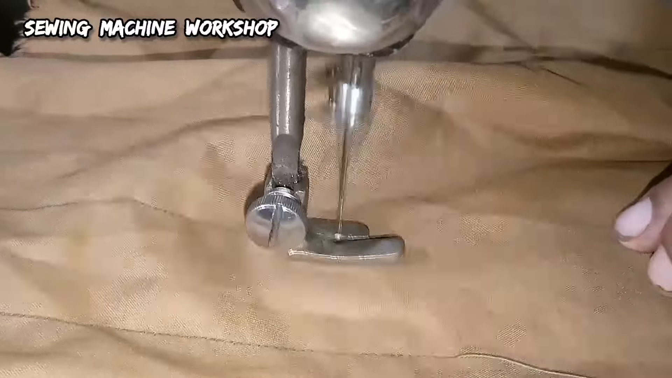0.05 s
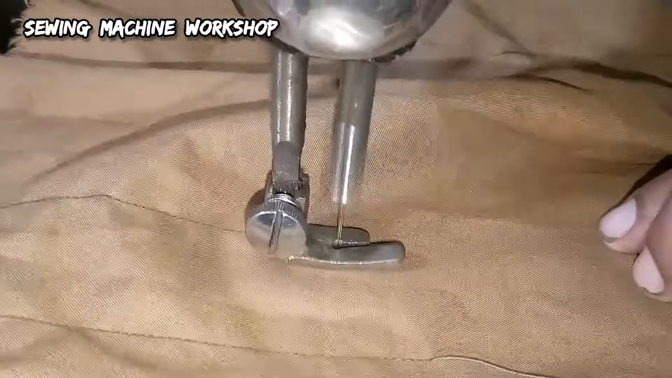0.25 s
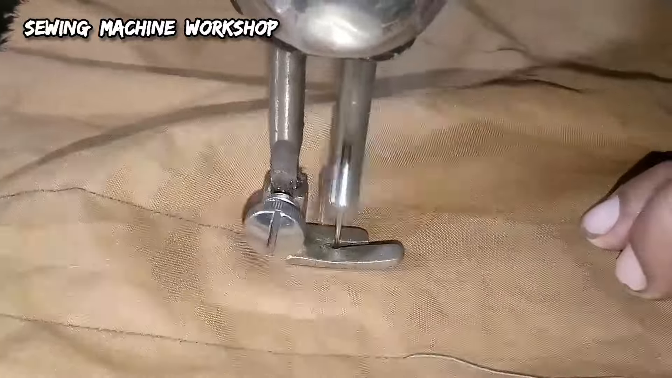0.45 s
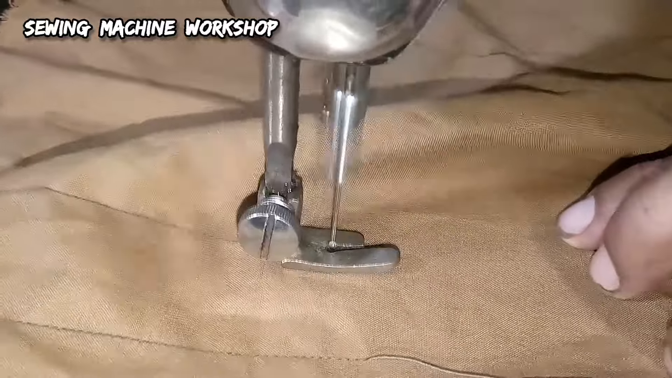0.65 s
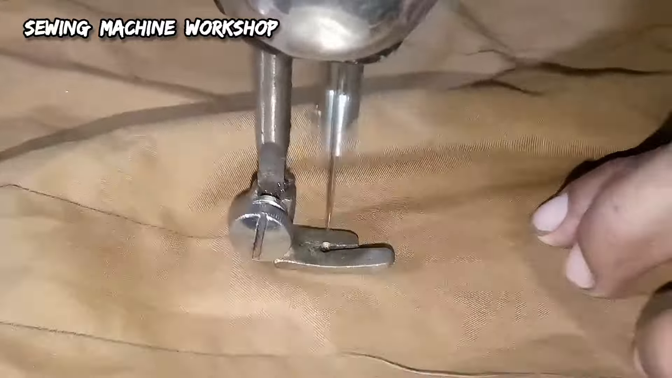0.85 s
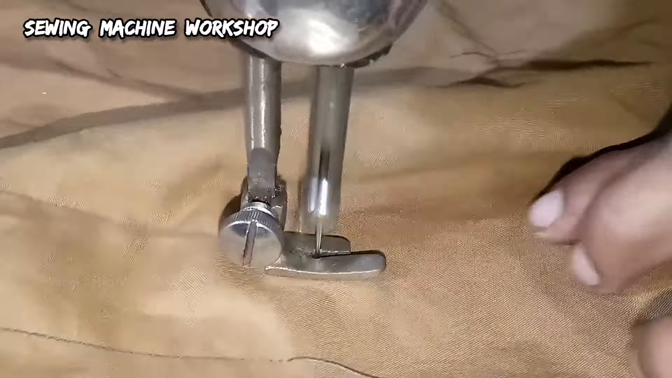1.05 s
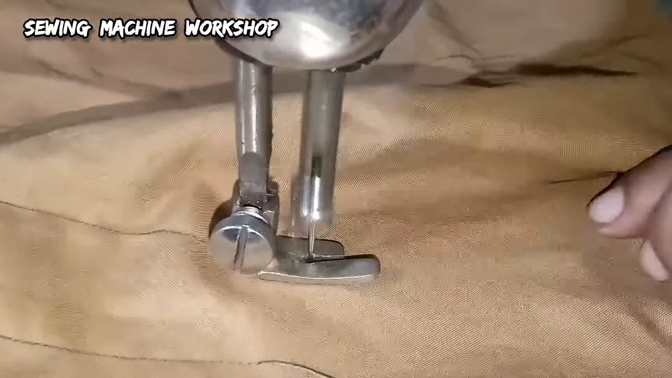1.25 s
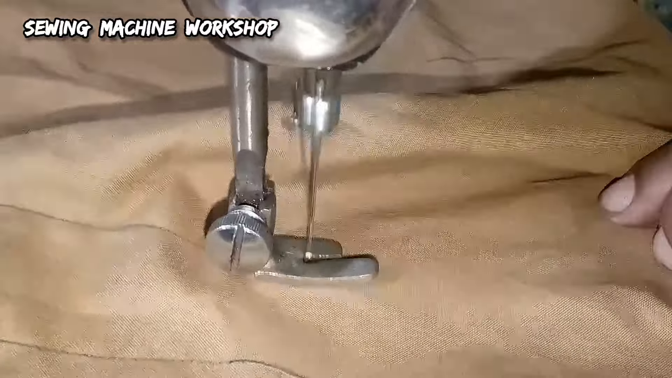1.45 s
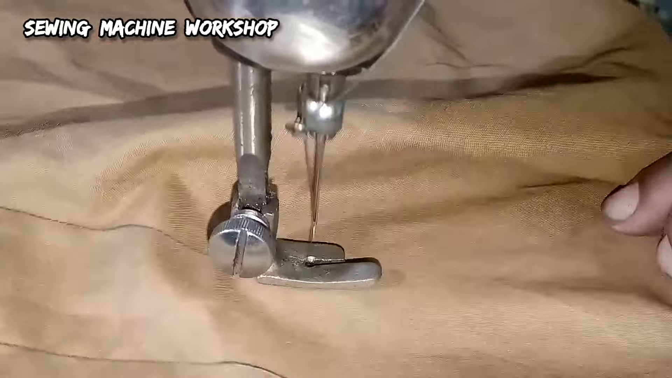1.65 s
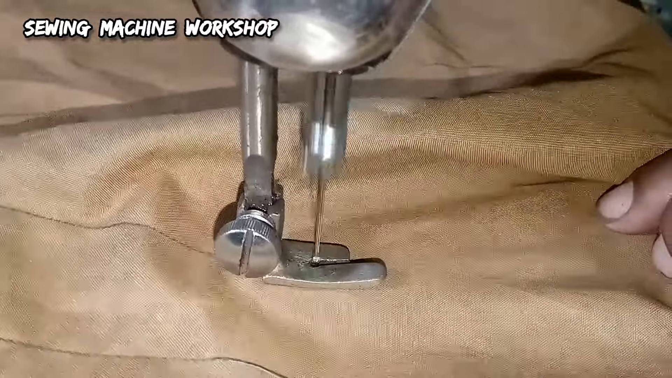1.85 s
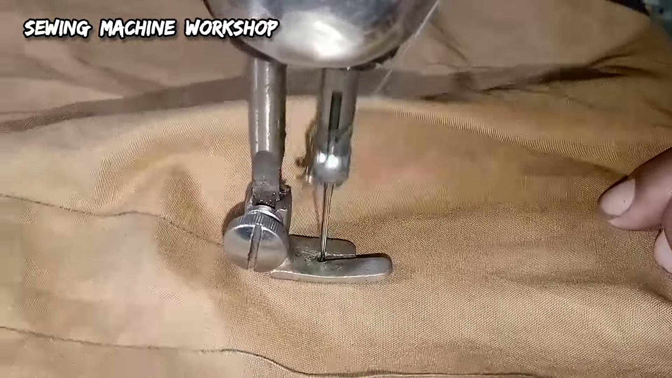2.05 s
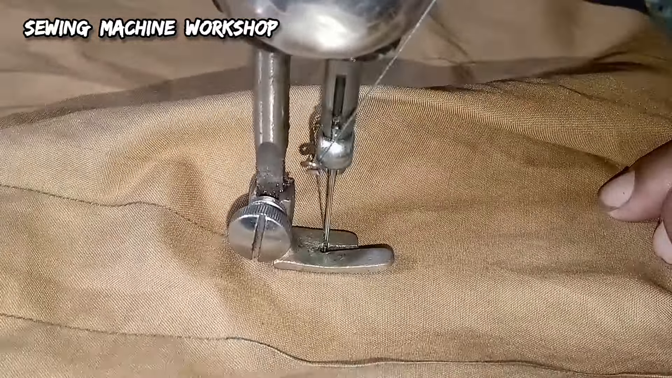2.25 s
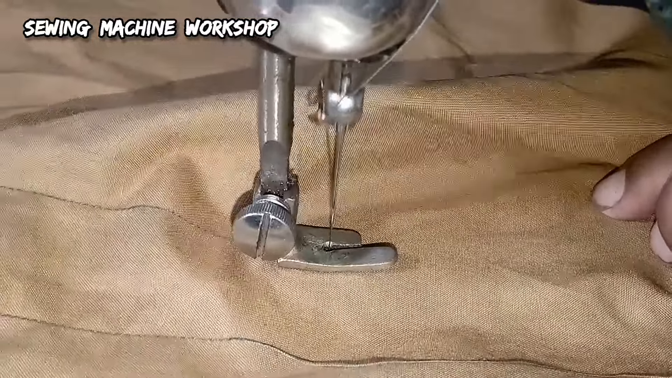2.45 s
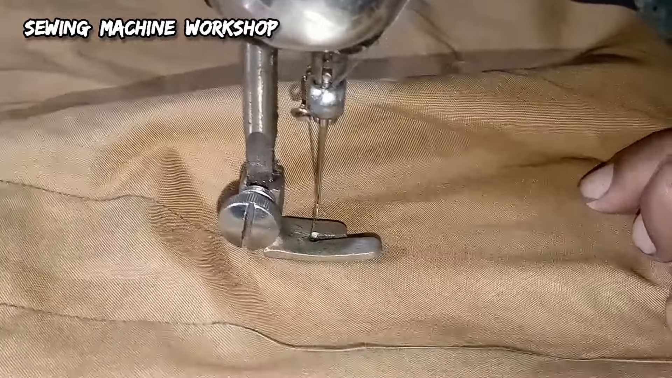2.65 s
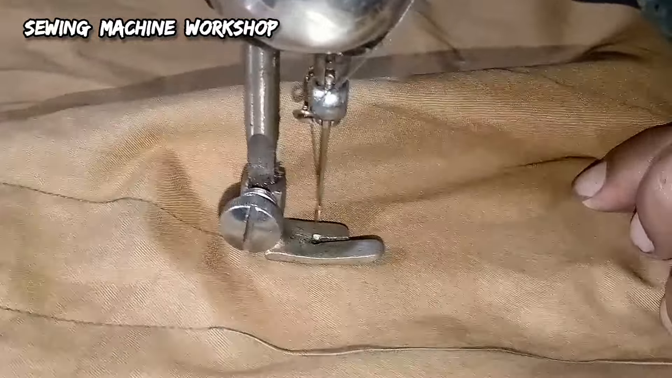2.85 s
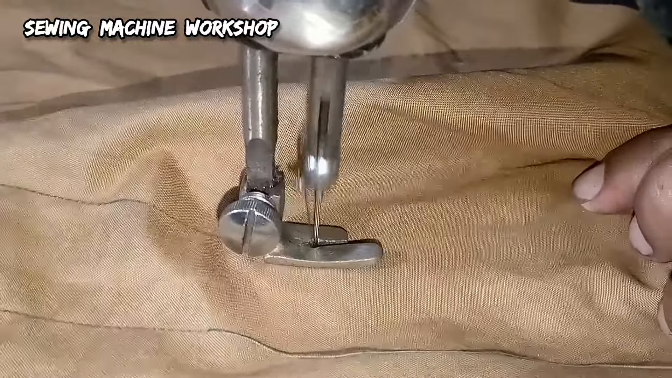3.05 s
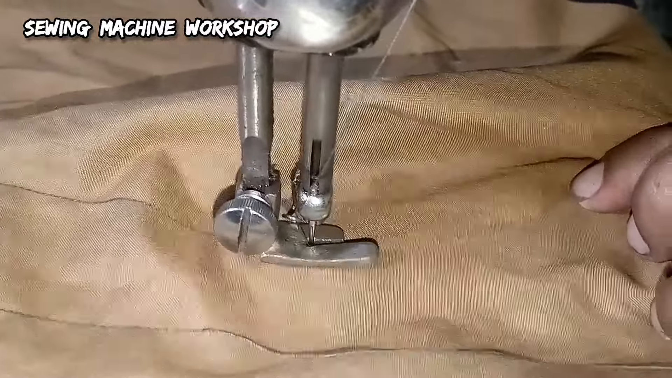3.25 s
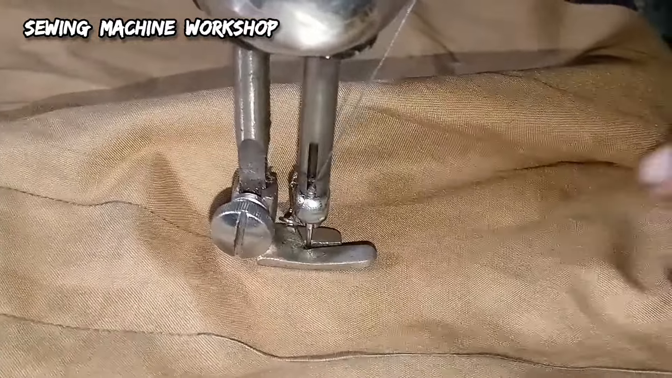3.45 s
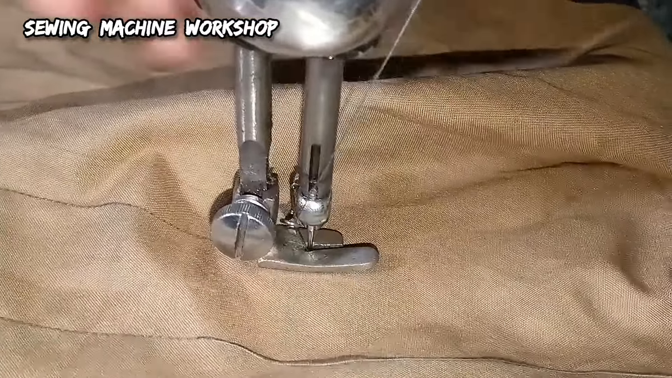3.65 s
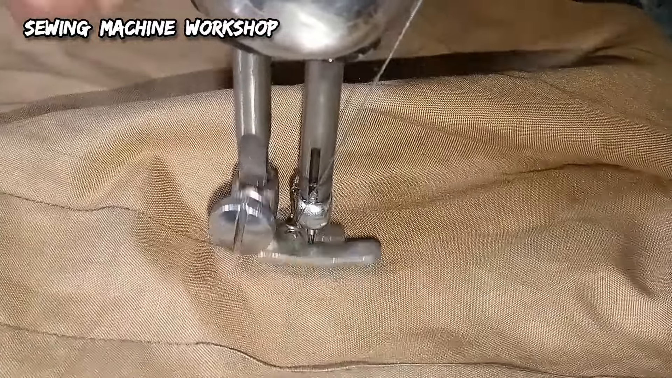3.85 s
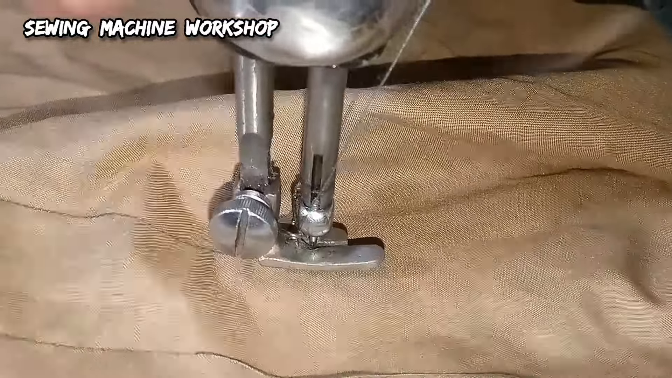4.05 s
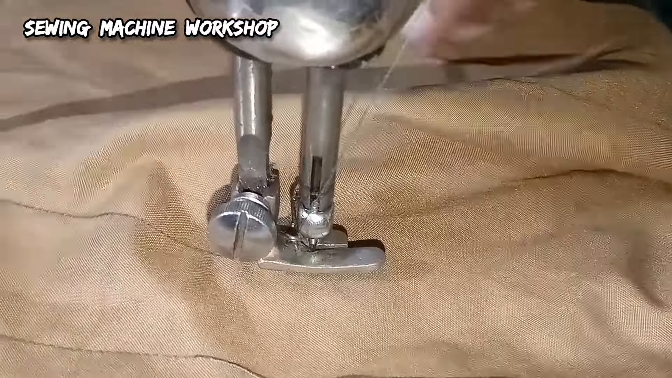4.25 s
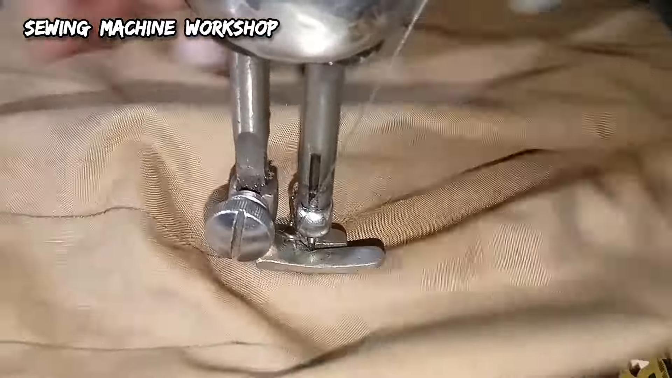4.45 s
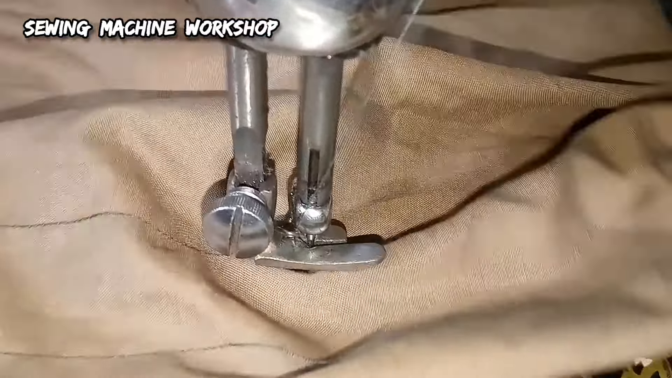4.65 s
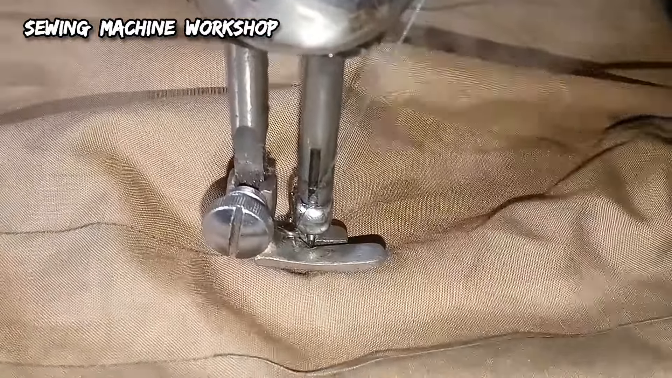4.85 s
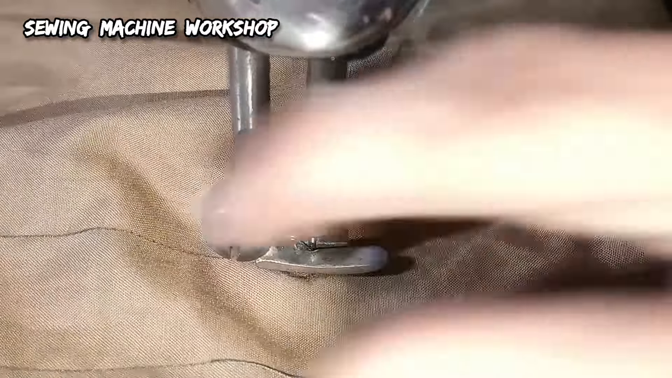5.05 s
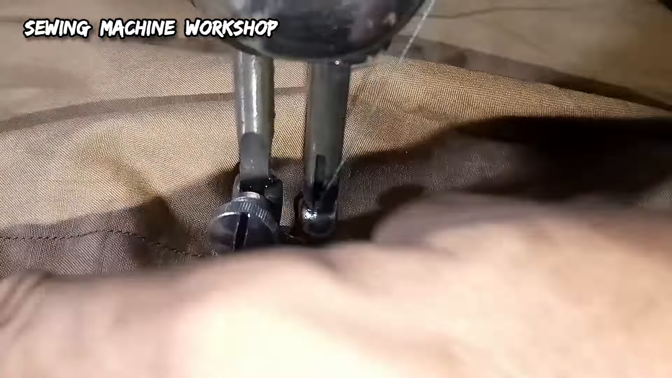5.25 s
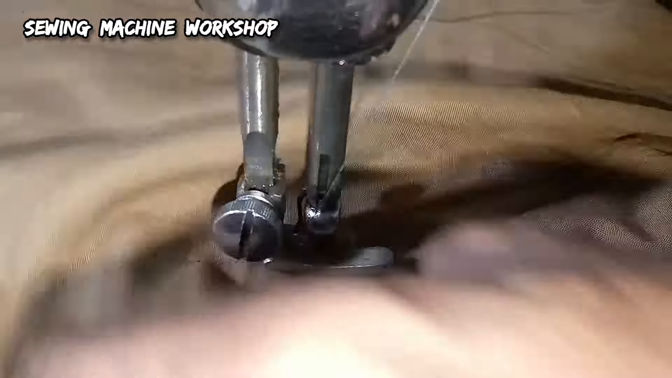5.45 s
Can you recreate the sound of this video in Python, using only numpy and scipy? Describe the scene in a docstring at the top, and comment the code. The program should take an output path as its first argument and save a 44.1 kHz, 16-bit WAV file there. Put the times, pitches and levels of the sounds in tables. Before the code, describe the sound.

One continuous fast run of stitching, nearly twenty strokes per second and slightly uneven, with a hard clack about one second in, winds down to a halt. The much quieter remainder holds small mechanical clicks, a short scrape, a couple of firmer clacks, then fabric sliding and light hand taps on the table and metal plate. Dry close microphone, short indoor reflections, low room rumble, barely audible cricket chirps.

```python
"""A sewing machine runs a seam at up to 19 stitches/s, close to the microphone, and coasts to a stop at 2.25 s.
The needle is then inched by hand, the mechanism clacks and the cloth is shifted; room noise, a faint cricket.
Every shaft turn plays one round of knocks through resonant bed, arm, linkage and needle, and shoves the table.
Each part loses a fixed number of dB per halving of speed; at a crawl the knocks fade further.
Scraping and cloth are grainy noise through the same kind of resonances; the cricket is a noise-smeared tone."""
import sys
import numpy as np
from scipy import signal
from scipy.fft import rfft, irfft
from scipy.io import wavfile
from scipy.ndimage import uniform_filter1d

SR = 44100
rng = np.random.default_rng(int(sys.argv[2]) if len(sys.argv) > 2 else 0)


def wav_record(signal):
    """Record a signal, one row per channel, as 16-bit PCM in the file named by sys.argv[1]."""
    frames = np.transpose(np.atleast_2d(signal))
    bounded = np.clip(frames, -1, 1)
    # unit amplitude maps onto the largest positive 16-bit level
    quanta = np.round(bounded * 32767).astype(np.int16)
    wavfile.write(sys.argv[1], SR, quanta)


N = 242546
TIME = np.arange(N) / SR

# resonances of the machine bed: f/Hz, width/Hz, level/dB
BED_MODES = [(364, 15, 0), (413.2, 18, 7), (440, 13, 5.5), (478, 35, -17), (611, 130, -11)]
# resonances of the arm: f/Hz, width/Hz, level/dB
ARM_MODES = [(757, 23, -22.5), (781, 49, -10.5), (1053.8, 31, 3)]
# resonances of the linkage: f/Hz, width/Hz, level/dB
LINKAGE_MODES = [(1124, 340, -11), (1632, 270, -5.5), (1836, 160, 2.3), (2020, 240, -5), (2310, 230, -3.5),
                 (2478, 230, 2), (2730, 150, -5), (3074, 610, -17), (4020, 2500, -25.5)]
# resonances of the needle: f/Hz, width/Hz, level/dB
NEEDLE_MODES = [(4400, 430, -28), (5000, 540, -3.5), (5754, 520, 2.5), (6190, 450, 7), (7060, 1000, -12.5),
                (9205, 2400, -26), (12000, 4000, -35.5), (14800, 1000, -33)]
# broad colour of cloth sliding on the bed: f/Hz, width/Hz, level/dB
CLOTH_MODES = [(410, 310, 4), (1047, 600, -5), (1730, 900, -0.5), (2378, 600, -0.5), (3640, 2600, -20.5),
               (6100, 1700, -13), (9800, 6000, -39)]


def undb(db):
    """Decibels to amplitude gain."""
    return 10 ** (np.asarray(db) / 20)


def unit(x):
    """Scale to rms 1."""
    return x / np.sqrt(np.mean(x ** 2))


def through(x, response):
    """Convolve with an impulse response, cut to scene length."""
    return signal.fftconvolve(x, response)[:N]


def body(modes, contact=1.47):
    """Minimum-phase impulse response, unit energy; wide modes stand for clusters and get steeper skirts."""
    f_hz = np.arange(1, SR // 4 + 2) * 2.
    power = 0
    for mode_hz, width_hz, db in modes:
        detune = (f_hz / mode_hz - mode_hz / f_hz) * mode_hz / width_hz
        skirt = detune ** 4 if width_hz > 140 else detune ** 2
        power = power + undb(db) ** 2 / (1 + skirt)
    # heavy parts give way slowly: roll-off above the highest mode
    top_hz = contact * modes[-1][0]
    power = power / (1 + (f_hz / top_hz) ** 6)
    # fold the cepstrum to make the response causal
    cepstrum = irfft(np.log(power + 1e-12))
    cepstrum[0] /= 2
    cepstrum[len(cepstrum) // 2:] = 0
    response = irfft(np.exp(rfft(cepstrum)))[:SR // 4]
    return response / np.sqrt(np.sum(response ** 2))


def impulses(times_s, sizes):
    """One impulse per blow, at the nearest sample."""
    out = np.zeros(N)
    index = np.clip(np.round(times_s * SR).astype(int), 0, N - 1)
    np.add.at(out, index, sizes)
    return out


def chatter(blows, decay_s, share, rise_s=0.0003):
    """Metal parts with play buzz against each other after each blow: a noise burst on the impulse."""
    t = TIME[:SR // 10]
    fade = np.exp(-t / decay_s) * (1 - np.exp(-t / rise_s))
    power = np.maximum(through(blows ** 2, fade / fade.sum()), 0)
    buzz = share * np.sqrt(power) * rng.standard_normal(N)
    # the looser the joint, the less of the first blow gets through
    return blows / np.sqrt(1 + share ** 2) + buzz


def shaft():
    """Shaft speed (stitches/s) and accumulated turns, per sample."""
    # shaft speed curve: t/s, speed/(stitches/s)
    speed_curve = [(0.0, 16.79), (0.1, 18.65), (0.2, 18.29), (0.3, 16.6), (0.4, 16.14), (0.5, 18.14),
                   (0.6, 18.61), (0.7, 17.24), (0.8, 18.82), (0.9, 19.37), (1.0, 17.18), (1.1, 16.3),
                   (1.5, 11.35), (1.7, 7.8), (1.8, 5.75), (1.9, 4.2), (2.05, 2.2), (2.25, 0)]
    speed = np.interp(TIME, *np.transpose(speed_curve))
    return speed, np.cumsum(speed) / SR


def passing(turns, share):
    """Times/s at which the shaft passes one angle, given as a share of a turn."""
    return np.interp(np.arange(np.ceil(turns[-1] - share)) + share, turns, TIME)


def force(speed, db, doubling_db, full_speed=18):
    """Drive gain: db at full speed (stitches/s), doubling_db less per halving."""
    octaves = np.log2(np.maximum(speed, 1e-9) / full_speed)
    return undb(db + doubling_db * octaves)


def running(modes, column, db, doubling_db, scatter_db, buzz_s, buzz, rub):
    """One part, struck by the round of knocks every turn and rubbed by its bearings in between."""
    # knocks of one stitch, relative within a part: angle/turn, bed/dB, arm/dB, linkage/dB, needle/dB
    stitch = [(.015, -3, 2, -0.5, -15), (.255, -2.5, -3, -0.5, 2), (.36, -4, 0.5, 2.5, -2.5),
              (0.449, -8, 4.5, -9, -7.5), (0.516, -4.5, -10.5, -1.5, -10.5), (0.602, -7, -9.5, -15, -26),
              (.66, -5.5, -9, 1.5, -21), (.71, -2, 2, -21.5, -1), (.82, -12.5, -7.5, -3.5, -8.5),
              (0.87, -4, -8, -4.5, -13), (.965, -6.5, -1.5, -4, -13.5)]
    throw_speed = 7.6  # stitches/s; a slower shaft throws the parts together less hard
    speed, turns = shaft()
    blows = np.zeros(N)
    for row in stitch:
        times_s = passing(turns, row[0])
        late, hard = rng.standard_normal((len(times_s), 2)).T
        blows += impulses(times_s + .0004 * late, undb(row[column] + scatter_db * hard))
    # rms 1 over the moving time only
    drive = unit(chatter(blows, buzz_s, buzz)) * np.sqrt(np.mean(speed > 0))
    drive *= np.minimum(speed / throw_speed, 1)
    drive += rub * rng.standard_normal(N)
    return through(drive * force(speed, db, doubling_db), body(modes))


def table_shake(db, doubling_db, up=.43, down=.93, rebound=0.68, rumble=0.45):
    """The needle bar reverses twice a turn, shoving the rumbling table each way; near full speed it rocks."""
    # table resonances: f/Hz, width/Hz, level/dB
    table_modes = [(91, 25, 0), (118.3, 11, 6)]
    rock_speed, rock_range, rock_db = 16.2, .6, 11.5  # stitches/s, stitches/s, dB
    speed, turns = shaft()
    shoves = np.zeros(N)
    for share, push in ((up, 1), (down, -rebound)):
        times_s = passing(turns, share)
        shoves += impulses(times_s, push * undb(1.5 * rng.standard_normal(len(times_s))))
    drive = shoves / np.sqrt(np.mean(shoves[speed > 0] ** 2))
    drive = drive + rumble * rng.standard_normal(N)
    rocking = .5 + .5 * np.tanh((speed - rock_speed) / (2 * rock_range))
    return through(drive * force(speed, db + rock_db * rocking, doubling_db), body(table_modes))


def thread(db=-70, doubling_db=3.5, tug=.6, tight_at=.1):
    """Thread hisses through its guides, most when pulled tight once a turn."""
    # colour of the hiss: f/Hz, width/Hz, level/dB
    guide_modes = [(9000, 2500, 2), (12500, 3000, -9.5), (14830, 900, 5.5)]
    speed, turns = shaft()
    pull = 1 + tug * np.cos(2 * np.pi * (turns - tight_at))
    hiss = rng.standard_normal(N) * pull
    return through(hiss * force(speed, db, doubling_db), body(guide_modes))


def machine():
    """The seam: heavy parts ring on, light ones clatter, all louder with shaft speed."""
    # resonances of the stand, added to those of the bed: f/Hz, width/Hz, level/dB
    stand_modes = [(170.8, 9.3, -4.5), (255.2, 25, 2.5), (292.6, 12, 0)]
    bed = running(stand_modes + BED_MODES, 1, db=-30.0, doubling_db=11, scatter_db=2.8,
                  buzz_s=0.0039, buzz=0.45, rub=0.25)
    arm = running(ARM_MODES, 2, db=-32, doubling_db=8, scatter_db=3.0,
                  buzz_s=0.0058, buzz=0.58, rub=0.45)
    linkage = running(LINKAGE_MODES, 3, db=-30.0, doubling_db=7.5, scatter_db=3.5,
                      buzz_s=0.0057, buzz=1.0, rub=0.43)
    needle = running(NEEDLE_MODES, 4, db=-41.5, doubling_db=9.0, scatter_db=2.0,
                     buzz_s=0.0033, buzz=0.91, rub=0.43)
    return bed + arm + linkage + needle + table_shake(db=-46.0, doubling_db=7) + thread()


def movements(rows, rise_share=0.3, release_s=0.036):
    """Hand speed: each movement swells over a share of its length, holds and dies away."""
    out = np.zeros(N)
    for start_s, length_s, db in rows:
        rise = np.clip((TIME - start_s) / (rise_share * length_s), 0, 1)
        release = np.exp(-np.maximum(TIME - start_s - length_s, 0) / release_s)
        out = np.maximum(out, undb(db) * rise * release)
    return out


def walk(rate_hz):
    """Random levels held 1 / rate_hz and slewed twice; spread near 1."""
    k = int(SR / rate_hz)
    held = np.repeat(rng.standard_normal(N // k + 1), k)
    return 1.3 * uniform_filter1d(uniform_filter1d(held, k), k)[:N]


def friction(grain_db, flutter_db):
    """Surfaces catch and slip in dense small grains: noise with fast and slow level walks, rms 1."""
    return unit(rng.standard_normal(N) * undb(grain_db * walk(500) + flutter_db * walk(40)))


def cloth(rest_db=-76):
    """The weave rasps over the bed at each push, and faintly under the resting hand."""
    # pushes that slide the cloth: start/s, length/s, level/dB
    pushes = [(4.02, 0.12, -66), (4.356, 0.2, -58), (4.655, 0.047, -64.5), (4.784, 0.17, -65.5),
              (5.44, 0.068, -64.5)]
    slip = np.maximum(movements(pushes), undb(rest_db))
    return through(friction(grain_db=2.5, flutter_db=2.2), body(CLOTH_MODES)) * slip


def cricket(hz=6780, glide_hz=200, width_hz=520, db=-76.0):
    """Faint, even chirps: each tone rises a little and is smeared by distance, as noise modulation."""
    chirp_hz, chirp_at_s = 9.59, .033  # chirp rate, centre of one chirp
    phase = ((TIME - chirp_at_s) * chirp_hz + .5) % 1
    lowpass = signal.butter(2, width_hz / 2, fs=SR, output="sos")
    rasp = unit(signal.sosfilt(lowpass, rng.standard_normal(N)))
    tone = np.sin(2 * np.pi * np.cumsum(hz + glide_hz * (phase - .5)) / SR)
    swell = .4 + np.sin(np.pi * phase) ** 2
    return undb(db) * unit(tone * rasp * swell)


def air(db=-60.5):
    """Steady room noise, mostly low rumble: white noise shaped in frequency."""
    # relative room noise density: f/Hz, level/(dB per Hz)
    noise_curve = [(30, 10), (75, 3), (125, 6.5), (200, -3), (280, 0.5), (430, -4.5), (600, -9.5),
                   (1100, -14.5), (2400, -16), (4200, -32), (6500, -21.5), (8000, -36.5), (12000, -38),
                   (15500, -47)]
    hz, density_db = np.transpose(noise_curve)
    f_hz = np.maximum(np.arange(N // 2 + 1) * SR / N, 1)
    gain = undb(np.interp(np.log(f_hz), np.log(hz), density_db))
    return undb(db) * unit(irfft(rfft(rng.standard_normal(N)) * gain, N))


def struck(modes, times_s, db, buzz_s, buzz, contact=1.47):
    """Single blows on one part, via its peak-normalised response; lower contact is softer and duller."""
    response = body(modes, contact)
    blows = impulses(times_s, undb(db))
    return through(chatter(blows, buzz_s, buzz), response / np.abs(response).max())


def knocks():
    """Slack in the mechanism is taken up with a clack; a hand bumps the table top and taps the plate."""
    # clacks: t/s, linkage level/dB, weight (more into bed and arm)/dB, sharpness (more into needle)/dB
    clacks = [(0.376, -35, -8, -3), (0.825, -20, 9.5, -8), (.879, -26.5, 13, -4), (.942, -20.5, 1.5, 7),
              (.959, -10, -8, 3), (.966, -17.5, -6, 3), (.974, -22, 8.5, 7), (1.725, -24, -5, 2),
              (1.772, -34, 4.5, -6), (1.894, -26.5, -10, 0), (1.899, -28.5, -12, 8),
              (1.962, -24.5, -11, -7), (2.413, -47.5, -2, 5), (2.480, -47.5, 2.5, -5),
              (2.529, -46.5, 0, 19), (2.700, -45.5, 1, -16), (2.874, -46, 4, -6), (2.923, -49, 2, -16),
              (2.970, -40.5, -2, 1), (2.990, -52, 10, 0), (3.041, -53, 8, 5), (3.116, -56.5, 8, 6),
              (3.139, -34, -3.5, -14), (3.148, -35, 0, -15), (3.442, -44.5, -5, -10.5),
              (3.774, -44, 4.5, 4), (3.914, -41, 8.5, 12), (3.941, -26, 6.5, 19), (3.9473, -34, 6, 6),
              (3.9553, -40.5, 14, 10)]
    # soft bumps on the table top: t/s, level/dB
    bumps = [(3.777, -32), (4.515, -52), (4.925, -52), (5.157, -36.5), (5.196, -41), (5.25, -43.5)]
    # finger taps on the needle plate: t/s, level/dB
    plate_taps = [(4.639, -50), (4.912, -55), (4.933, -49), (5.244, -43.5), (5.255, -46), (5.275, -53),
                  (5.301, -51)]
    # loose cover plates that rattle on: f/Hz, width/Hz, level/dB
    cover_modes = [(730, 320, -1), (1430, 370, -7), (2250, 600, -4.5), (3290, 240, -7.5),
                   (5700, 260, -14.5), (9500, 700, -30)]
    # table top resonances: f/Hz, width/Hz, level/dB
    top_modes = [(254, 15, -16), (265, 12, -3), (347.4, 51, -2.5), (429, 19, 3)]
    # needle plate resonances: f/Hz, width/Hz, level/dB
    plate_modes = [(449, 20, 12.5), (890, 600, -5), (1280, 150, -4.5), (1730, 350, -10), (1970, 120, -2),
                   (2720, 820, -21.5)]
    bed_db, arm_db, needle_db, cover_db = -10.5, -2.5, -12, -13.5  # against the linkage
    t_s, db, weight_db, sharp_db = np.transpose(clacks)
    return (struck(BED_MODES, t_s, db + weight_db + bed_db, buzz_s=0.0043, buzz=0.435)
            + struck(ARM_MODES, t_s, db + weight_db + arm_db, buzz_s=0.0025, buzz=0.66)
            + struck(LINKAGE_MODES, t_s, db, buzz_s=0.0032, buzz=1.4)
            + struck(NEEDLE_MODES, t_s, db + sharp_db + needle_db, buzz_s=0.0036, buzz=0.53)
            + struck(cover_modes, t_s, db + cover_db, buzz_s=0.023, buzz=2.4)
            + struck(top_modes, *np.transpose(bumps), buzz_s=0.013, buzz=1.0, contact=0.8)
            + struck(plate_modes, *np.transpose(plate_taps), buzz_s=0.0057, buzz=2.36))


def inching(arm_db=-5, linkage_db=-3, needle_db=-18, cloth_db=-5):
    """Turned by hand, bearings scrape against arm, linkage and needle bar; the feed drags the cloth."""
    # hand wheel nudges: start/s, length/s, level ahead of the part gains/dB
    nudges = [(2.33, .07, -65.5), (2.515, 0.063, -50.5), (2.61, 0.11, -64), (2.86, .34, -65.5),
              (3.68, 0.33, -69)]
    turning = movements(nudges)
    parts = ((ARM_MODES, arm_db), (LINKAGE_MODES, linkage_db),
             (NEEDLE_MODES, needle_db), (CLOTH_MODES, cloth_db))
    out = np.zeros(N)
    for modes, db in parts:
        scrape = friction(grain_db=3.0, flutter_db=2.5) * turning
        out += undb(db) * through(scrape, body(modes))
    return out


def room(x, t60_low_s=.33, t60_high_s=0.099, wet_db=-12.5, gap_s=0.004, bass_hz=480):
    """Near walls add a short, dense tail, faster in the treble; the bass stays with the table."""
    t = TIME[:SR // 2]
    highpass = signal.butter(2, bass_hz, "high", fs=SR, output="sos")
    noise = signal.sosfilt(highpass, rng.standard_normal(len(t)))
    low = signal.sosfilt(signal.butter(1, 2500, fs=SR, output="sos"), noise)
    tail = low * np.exp(-np.log(1000) * t / t60_low_s)
    tail += (noise - low) * np.exp(-np.log(1000) * t / t60_high_s)
    tail *= 1 - np.exp(-(t / gap_s) ** 2)
    return x + undb(wet_db) * through(x, tail / np.sqrt(np.sum(tail ** 2)))


def scene():
    """Machine, hand and cloth in the room, over cricket and room noise; one channel."""
    near = machine() + inching() + knocks() + cloth()
    return (room(near) + cricket() + air())[None]


def record(dry):
    """The microphone drops the deep bass and cuts the top."""
    bass_cut = signal.butter(3, 68, "high", fs=SR, output="sos")
    top_cut = signal.ellip(8, .2, 70, 15600, fs=SR, output="sos")
    return signal.sosfilt(top_cut, signal.sosfilt(bass_cut, dry))


dry = scene()
out = record(dry)
wav_record(out)
```